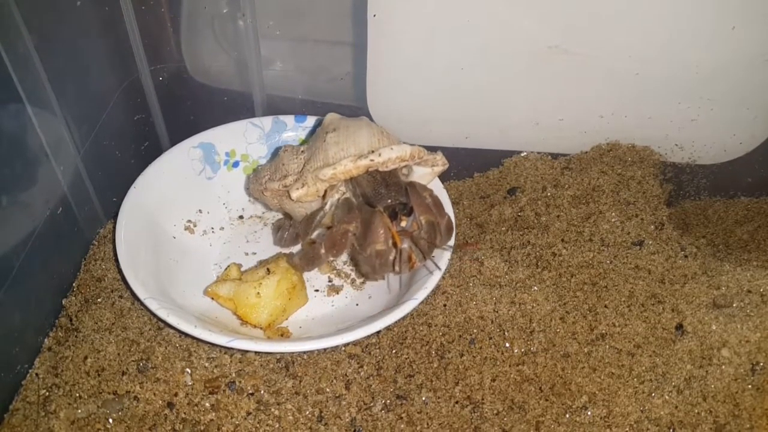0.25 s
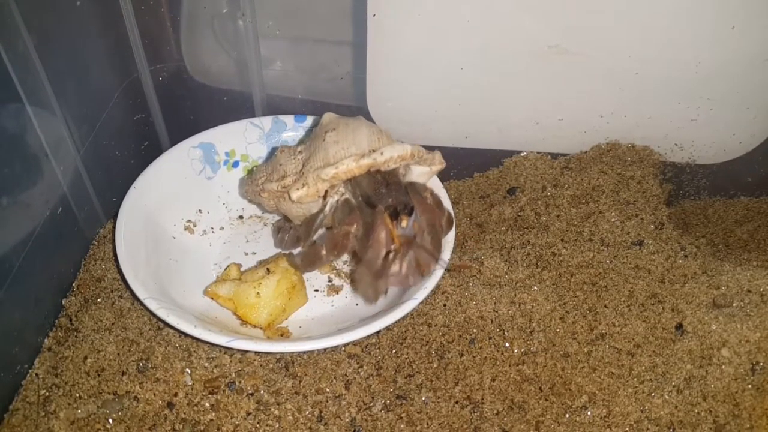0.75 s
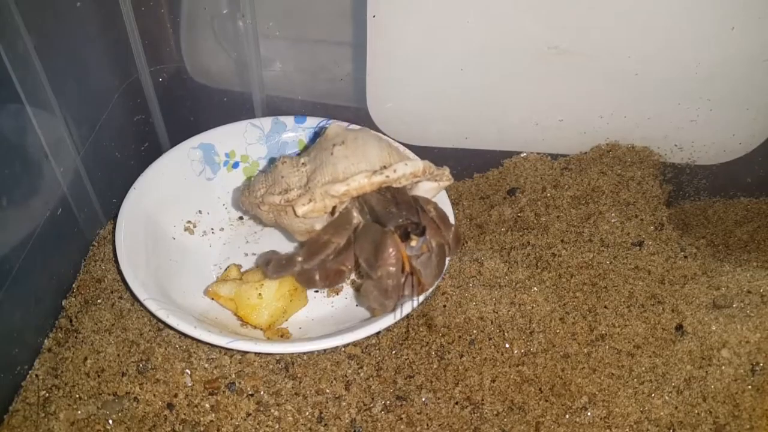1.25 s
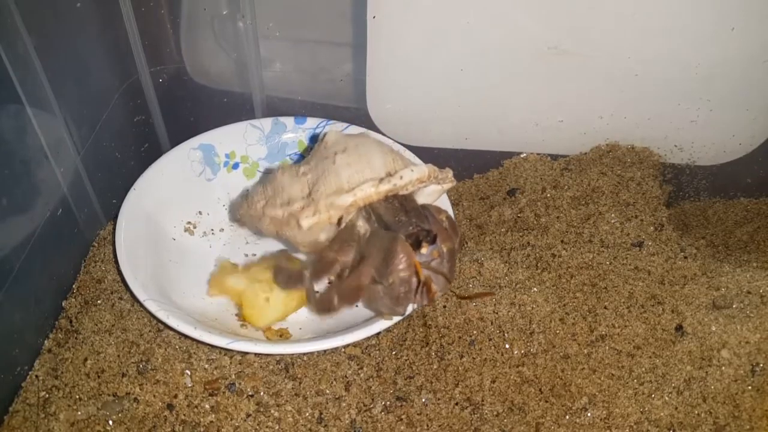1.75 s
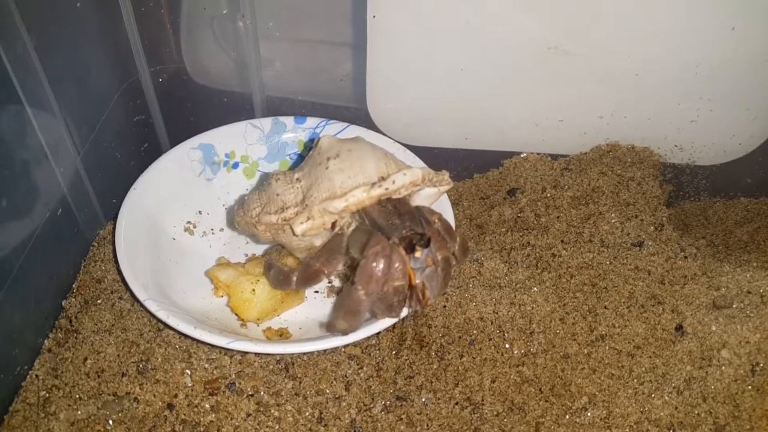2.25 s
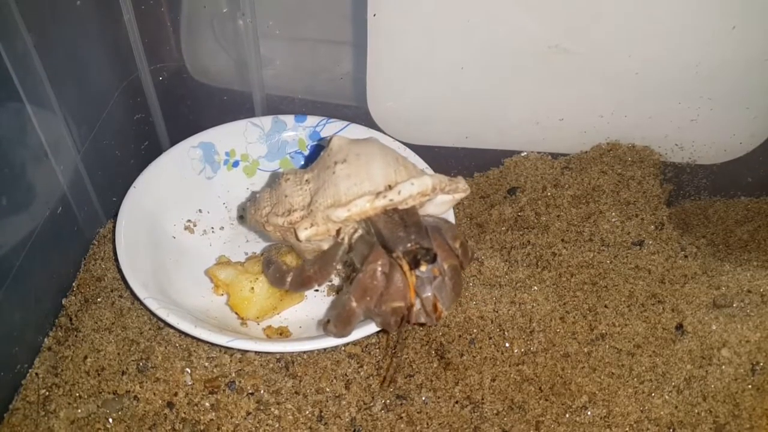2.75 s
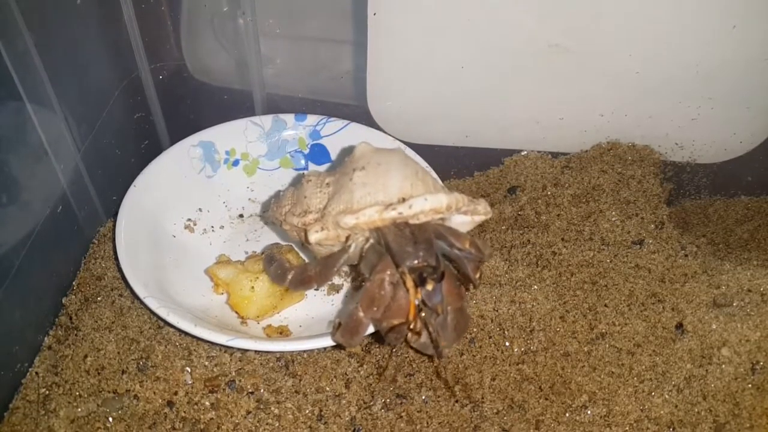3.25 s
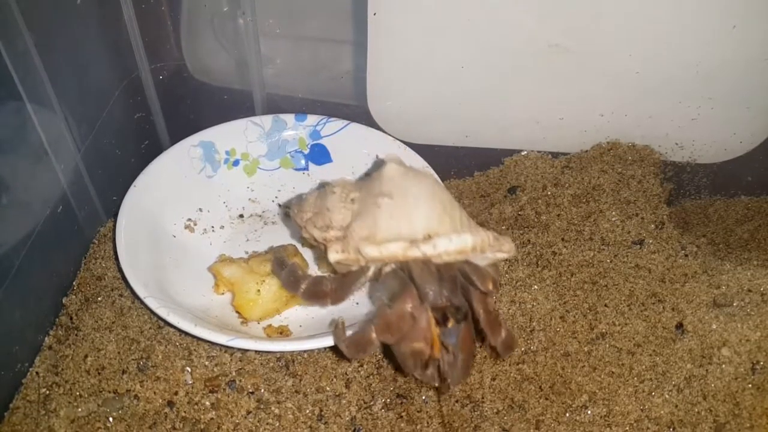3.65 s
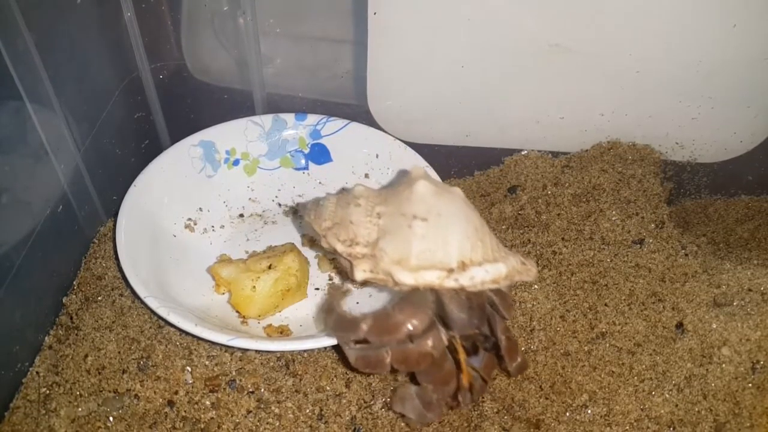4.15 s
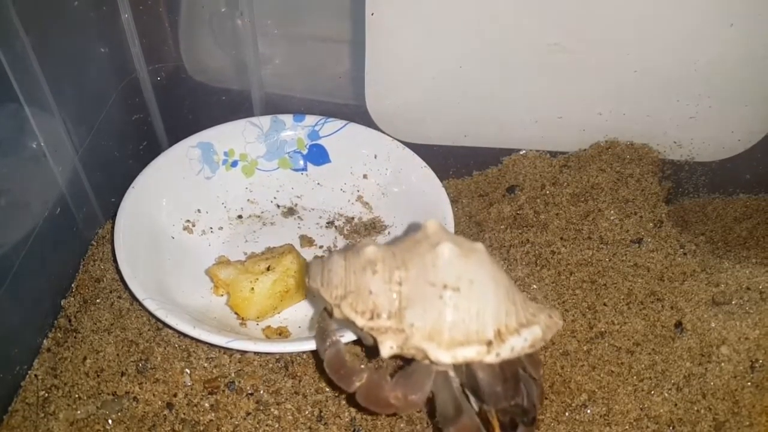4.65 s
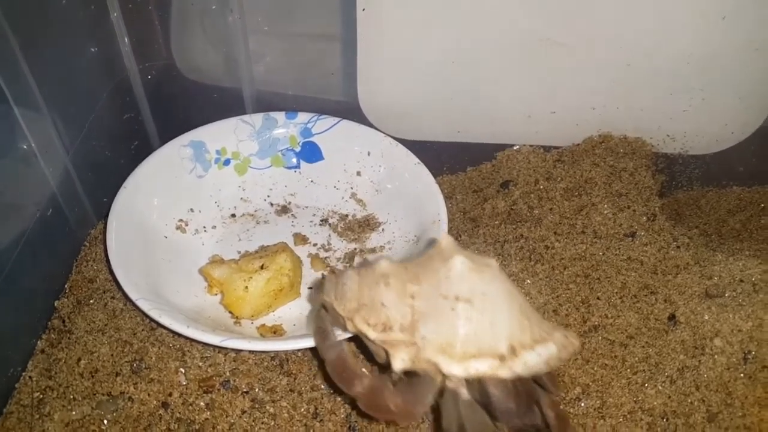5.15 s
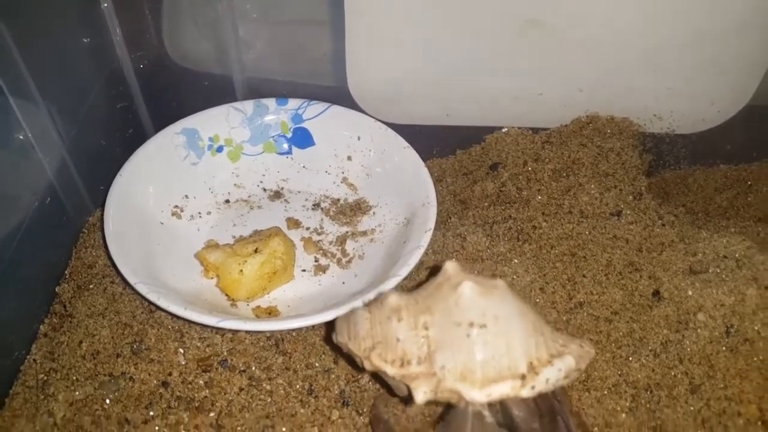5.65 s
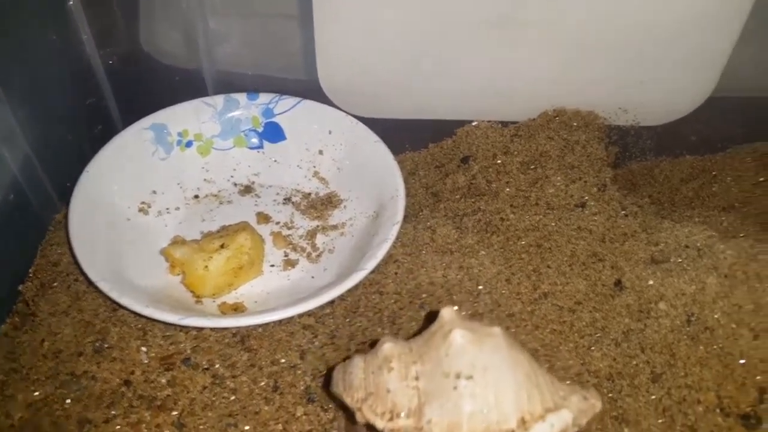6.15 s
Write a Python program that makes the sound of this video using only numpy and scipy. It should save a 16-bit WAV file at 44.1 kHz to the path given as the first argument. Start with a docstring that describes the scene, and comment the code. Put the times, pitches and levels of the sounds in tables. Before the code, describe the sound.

Small irregular ceramic taps and dry ticks thicken into thuds and short scrapes, then a sharp squeaky snap and sandy crunches, above electrical hum and hiss.

```python
"""A hermit crab climbs off a ceramic plate that lies on sand in a plastic tub.
Legs and shell tap the plate, whose decaying modes ring, and bump the lower modes of the tub.
Noise snaps make dry ticks; random slips make the shell drag and squeak; dense grains crunch as sand.
A diffuse tail gives the room, where steady sines hum and drone under shaped noise for air and hiss."""
import sys
import numpy as np
from scipy import signal
from scipy.fft import rfft, irfft, next_fast_len
from scipy.io import wavfile

SR = 44100
rng = np.random.default_rng(int(sys.argv[2]) if len(sys.argv) > 2 else 0)


def to_wav(sig):
    """Store sig (one row per channel, or 1-D mono) as 16-bit WAV at the path in sys.argv[1].

    Samples outside -1..1 are clipped; the rate is SR.
    """
    pcm = np.clip(np.atleast_2d(sig), -1, 1) * 32767
    pcm = np.round(pcm).astype(np.int16)
    wavfile.write(sys.argv[1], SR, pcm.T)  # frames by channels


N = 281799
TIME = np.arange(N) / SR

# Modes of the plate, damped by the sand. Each row: nominal frequency in Hz, relative level in dB,
# t60 in seconds before contact damping, left over right in dB.
PLATE_MODES = [(997, 5, 0.039, -3), (2187, -9.5, 0.13, -2), (2244, -6.5, 0.034, 20), (3150, -7, .03, 16),
               (3880, -0.5, 0.043, -20), (4330, 0.5, 0.021, -9), (4560, -1.5, 0.013, -4),
               (5770, 2.5, 0.05, -21), (7870, -15, 0.014, 10), (9030, -19, 0.12, 23), (10170, 1, 0.026, 6)]
# Modes of the tub with its sand. Each row: frequency in Hz, relative level in dB,
# t60 in seconds, left over right in dB.
TUB_MODES = [(112, -5, 0.072, 0), (174.5, -1, 0.12, -3.5), (282, 0, 0.021, -1), (341, 0, 0.045, -2.5),
             (455, -3, 0.057, -6.5), (654, 1, 0.022, -6.5), (816, -2.5, 0.023, -23),
             (1090, 0.5, 0.0072, -29)]


def from_db(db):
    """Gain for a level in dB."""
    return 10 ** (np.asarray(db) / 20)


def rms_one(x):
    """Scales to an rms of one."""
    return x / np.sqrt(np.mean(x ** 2) + 1e-30)


def at_hz(points, hz):
    """Reads a curve on a log-frequency axis."""
    f, value = np.transpose(points)
    return np.interp(np.log(hz), np.log(f), value)


def pan(db):
    """Left and right gains with a mean power of one."""
    return rms_one(from_db([[db / 2], [-db / 2]]))


def add(out, s, sound):
    """Mixes a short sound in at time s."""
    i = int(s * SR)
    out[:, i:i + sound.shape[-1]] += sound[:, :N - i]


def drift(rate):
    """Slow random wander through about unit-spread values, rate of them per second."""
    knots = rng.standard_normal(400)
    return np.interp(TIME * rate, np.arange(len(knots)), knots)


def noise(spectrum):
    """Two unrelated noises with the given dB per Hz."""
    size = next_fast_len(N)
    hz = np.maximum(np.arange(size // 2 + 1) * SR / size, 1)
    white = rfft(rng.standard_normal((2, size)))
    shaped = irfft(white * from_db(at_hz(spectrum, hz)), size)
    return shaped[:, :N] * np.sqrt(SR / 2)


def band(x, low_hz, high_hz):
    """Second-order Butterworth band-pass design."""
    sos = signal.butter(2, [low_hz, min(high_hz, SR / 2 - 1)], "band", fs=SR, output="sos")
    return signal.sosfilt(sos, x)


def ring(clicks, hz, t60):
    """A two-pole resonance: a unit click sets off a decaying sine that starts from height one."""
    r, w = np.exp(-np.log(1000) / (t60 * SR)), 2 * np.pi * hz / SR
    return signal.lfilter([0, np.sin(w)], [1, -2 * r * np.cos(w), r * r], clicks + 1e-18)


def grains(per_s, spread_db):
    """Random clicks of uneven size and either sign, rms one."""
    sizes = from_db(spread_db * np.minimum(rng.exponential(1, N), 3)) * rng.choice([-1, 1], N)
    return rms_one(sizes * (rng.random(N) < per_s / SR))


def swell(t, length):
    """A rounded rise and fall between t = 0 and length."""
    return np.sqrt(np.clip(1 - (2 * t / length - 1) ** 2, 0, 1))


def strike(modes, gains_db, lag_s):
    """Modes ring out after one blow; the sound reaches the right microphone later."""
    t = np.maximum(TIME[:SR // 4] - np.array([[0], [lag_s]]), 0)
    out = 0
    for k, ((hz, db, t60, side), gain_db) in enumerate(zip(modes, gains_db)):
        decay = np.exp(-np.log(1000) * t / t60)
        polarity = (-1) ** k
        out = out + polarity * pan(side) * from_db(db + gain_db) * np.sin(2 * np.pi * hz * t) * decay
    return out


def rubbed(slips, modes, grip):
    """Modes kept ringing by a stream of slips; each is scaled so that its decay time leaves its rms alone."""
    out = 0
    for k, (hz, db, t60, side) in enumerate(modes):
        even_rms = 2 * np.sqrt(np.log(1000) / (t60 * SR))
        gain = from_db(db + at_hz(grip, hz)) * even_rms
        out = out + (-1) ** k * pan(side) * gain * ring(slips, hz, t60)
    return out


def taps(crack_db=-2.5, crack_tilt=-0.5, thud_db=-6.5, thud_hz=226, hardness_db=10):
    """Each tap cracks at the contact, rings the plate and shakes the tub through the sand."""
    # Taps of legs and shell; the plate's lowest mode shifts with the crab's weight.
    # Each row: start in seconds, drive in dB before contact colour and gains,
    # hardness of the contact from 0 to 1, lowest mode in Hz.
    tap_rows = [(0.271, -59, 0.06, 1090), (0.342, -58, 0.39, 1010), (0.4622, -52.5, 0.01, 1055),
                (0.5406, -64, .2, 990), (0.5755, -59, 0.25, 990), (0.8819, -49.5, 0.81, 1060),
                (1.169, -57.5, 0.34, 1020), (1.851, -60.5, 0.38, 980), (2.626, -53, 0.04, 963),
                (3.037, -69, 0.72, 1000), (3.051, -71, 0.74, 1030), (3.067, -48.5, 0.07, 980),
                (3.158, -59, .2, 966), (3.175, -58, 0.08, 980), (3.222, -61, .1, 1090),
                (3.492, -54, 0.35, 950), (4.353, -59, 0.14, 1025), (4.443, -56, 0.23, 1060),
                (4.4922, -63.5, .85, 1030), (4.596, -59, 0.25, 1020), (4.617, -55.5, 0.32, 1030),
                (4.678, -68.5, 0.6, 1000), (4.726, -63.5, 0.52, 970), (4.833, -71, 0.7, 1020)]
    out = np.zeros((2, N))
    for s, db, hardness, lowest_hz in tap_rows:
        add(out, s, clink(db, hardness, lowest_hz))
        # The crack follows the force at 4 kHz; its tilt is in dB per octave.
        add(out, s, crack(db + contact_db(hardness, 4000) + crack_db, crack_tilt))
        # The hard shell weighs in more than a leg.
        add(out, s, thud(db + thud_db + hardness_db * hardness, thud_hz))
    return out


def clink(db, hardness, lowest_hz, ring_db=5.0, scatter_db=1.5, build_s=0.00034, lag_s=0.00017):
    """One contact rings the plate; the ring builds up within a millisecond or so."""
    contact_damping = 0.17   # share of t60 that the hardest contact takes away by pressing on the plate
    modes = np.array([(lowest_hz, *PLATE_MODES[0][1:]), *PLATE_MODES[1:]])
    modes[:, 2] *= np.clip(1 - contact_damping * hardness, .1, 1)
    scatter = scatter_db * rng.standard_normal(len(modes))
    force = db + contact_db(hardness, modes[:, 0]) + scatter
    build_up = 1 - np.exp(-TIME[:SR // 4] / build_s)
    return strike(modes, ring_db + force, lag_s) * build_up


def contact_db(hardness, hz):
    """Colour of a contact: the harder it is, the higher its force reaches; higher modes radiate better."""
    soft_top_hz, hardness_octaves = 870, 2.64   # softest contact's top; the hardest reaches this much higher
    fall_db_per_octave, radiation_db_per_octave = 18, 8.5
    top_hz = soft_top_hz * 2 ** (hardness_octaves * hardness)
    loss_db = fall_db_per_octave * np.log2(hz / top_hz)
    radiation_db = radiation_db_per_octave * np.log2(hz / PLATE_MODES[0][0])
    return radiation_db - 10 * np.log10(1 + from_db(loss_db) ** 2)


def crack(db, tilt, mid_side_db=-9.0, edge_side_db=11.0, t60=0.029):
    """A dry snap of decaying noise bands rattles briefly between the walls of the tub."""
    # Colour of a tick. Each row: frequency in Hz, gain in dB.
    tick_colour = [(1200, -13.5), (2500, -8.5), (4000, -1.5), (9000, -9)]
    out, t = 0, TIME[:SR // 10]
    edges = np.geomspace(1000, 16000, 8)
    for low, high in zip(edges, edges[1:]):
        hz = np.sqrt(low * high)
        gain = from_db(db + at_hz(tick_colour, hz) + tilt * np.log2(hz / 4000))
        side_db = edge_side_db if hz > 7000 else mid_side_db
        rattle = rms_one(band(rng.standard_normal((2, len(t))), low, high))
        out = out + pan(side_db) * gain * rattle
    return out * np.exp(-np.log(1000) * t / t60)


def thud(db, contact_hz, level_db=6.0, scatter_db=3.0, lag_s=0.000095):
    """One contact shakes the low modes of the tub; the softer it is, the lower the modes it favours."""
    scatter = scatter_db * rng.standard_normal(len(TUB_MODES))
    modes = strike(TUB_MODES, db + level_db + scatter, lag_s)
    return signal.lfilter(*signal.butter(1, [contact_hz / 2, contact_hz * 2], "band", fs=SR), modes)


def patter(per_s=3.6, level_db=-69, hardness=.15, end_s=3.7, spread_db=4.0, pitch_spread=0.038):
    """Light footfalls touch the plate at random while the crab stands on it."""
    out = np.zeros((2, N))
    times = np.cumsum(rng.exponential(1 / per_s, size=40))
    for s, (strength, shift) in zip(times, rng.standard_normal((len(times), 2))):
        if s < end_s:
            lowest_hz = PLATE_MODES[0][0] * (1 + pitch_spread * shift)
            add(out, s, clink(level_db + spread_db * strength, hardness, lowest_hz))
    return out


def ticks():
    """Dry clicks of claw tips, legs and shell, some together with a tap that rings the plate."""
    # Each row: start in seconds, level in dB at 4 kHz before the tick colour, tilt in dB per octave.
    tick_rows = [(1.169, -63, -11), (1.339, -55, -2), (1.587, -59.5, 1), (1.873, -51, -4),
                 (1.892, -51.5, 1), (1.923, -50.5, -5.5), (3.037, -63, -6), (3.052, -52.5, -4.5),
                 (3.451, -52.5, 5.5), (4.194, -56, -0.5), (4.285, -50.5, -4), (4.396, -55, -5),
                 (4.493, -53, 8), (4.507, -51.5, 0)]
    out = np.zeros((2, N))
    for s, db, tilt in tick_rows:
        add(out, s, crack(db, tilt))
    return out


def bumps():
    """The heavy shell knocks against the bedded plate and drops onto the sand, which shakes the tub."""
    # Each row: start in seconds, drive in dB before the thud's gain, pitch that the contact favours in Hz.
    bump_rows = [(1.893, -55.5, 200), (1.924, -51, 306), (4.4407, -46, 450), (4.488, -54.5, 282),
                 (4.516, -44.5, 200), (4.5372, -46.5, 423), (4.559, -50.5, 220), (4.657, -53, 594),
                 (4.766, -53, 295), (4.832, -53, 600), (5.0869, -43.5, 800), (5.109, -56, 500),
                 (5.6087, -48, 85), (5.6106, -45.5, 500)]
    out = np.zeros((2, N))
    for s, db, contact_hz in bump_rows:
        add(out, s, thud(db, contact_hz))
    return out


def drag(grit_db=-16.5, attack_s=0.023, release_s=.09):
    """The hauled shell sticks and slips on the sandy rim, shakes tub and plate and scratches faintly."""
    # The crab hauls its shell over the rim, then over sand. Each row: start in seconds, length in seconds,
    # drive into the tub in dB, drive into the plate in dB.
    pulls = [(4.165, .08, -60.5, -64.5), (4.355, 0.18, -58, -65), (4.574, 0.2, -58, -63.5),
             (5.097, 0.062, -59.5, -68), (5.264, 0.027, -59.5, -67)]
    # How well dragging on the rim drives the plate. Each row: frequency in Hz, gain in dB.
    rim_grip = [(1000, -10.5), (2240, -4.5), (3100, -13), (3900, -7.5), (4400, -18), (5800, -20),
                (10000, -32)]
    # How well dragging drives the tub. Each row: frequency in Hz, gain in dB.
    tub_grip = [(110, -3), (180, 5), (360, -1), (620, -9), (1150, -14)]
    tub_force, plate_force = np.zeros((2, N))
    for s, length, tub_db, plate_db in pulls:
        # Each pull swells before its start and fades after its end.
        attack = 1 + (TIME - s) / attack_s
        release = 1 - (TIME - s - length) / release_s
        effort = np.clip(np.minimum(attack, release), 0, 1)
        tub_force = np.maximum(tub_force, from_db(tub_db) * effort)
        plate_force = np.maximum(plate_force, from_db(plate_db) * effort)
    on_tub = grains(per_s=90, spread_db=3.5) * tub_force
    on_plate = grains(per_s=140, spread_db=3.0) * plate_force
    grit = band(grains(per_s=860, spread_db=5.5) * tub_force, 1500, 13000)
    shaken = rubbed(on_tub, TUB_MODES, tub_grip) + rubbed(on_plate, PLATE_MODES, rim_grip)
    return shaken + from_db(grit_db) * grit


def squeak():
    """Fine friction excites the shell's short, high resonances: a soft slide, then a sharp snap free."""
    # Resonances of the slipping shell, each passed twice. Each row: frequency in Hz, relative level in dB,
    # t60 of one pass in seconds, left over right in dB.
    shell_modes = [(3920, -5.5, 0.0081, 16), (4230, -3, 0.0023, 20), (4750, -6, 0.0012, 0),
                   (8500, -13, 0.0015, 22), (11300, -13, 0.00098, 20)]
    start_s, length_s, slide_db = 5.562, 0.051, -61.5
    snap_s, snap_db, rise_s, fall_s = 5.6102, -38.5, 0.0017, 0.0008
    friction = grains(per_s=9000, spread_db=9.5)
    slide = from_db(slide_db) * swell(TIME - start_s, length_s)
    snap = from_db(snap_db) * np.exp(-np.maximum((snap_s - TIME) / rise_s, (TIME - snap_s) / fall_s))
    shell = 0
    for hz, db, t60, side in shell_modes:
        resonance = rms_one(ring(ring(friction, hz, t60), hz, t60))
        shell = shell + pan(side) * from_db(db) * resonance
    return (slide + snap) * shell


def crunches(upper_db=-3.0):
    """Each press sets off a short swell of grinding sand grains, partly shared by the two microphones."""
    # Feet and shell press into the sand. Each row: start in seconds, level in dB, length in seconds,
    # grain pitch in Hz.
    crunch_rows = [(0.61, -61.5, 0.0042, 2290), (5.006, -63, 0.0067, 3140), (5.11, -68.5, 0.13, 2450),
                   (5.28, -68, 0.12, 2270), (5.695, -67, 0.037, 2800), (5.814, -61, 0.025, 2450),
                   (5.852, -62.5, 0.019, 2660), (5.926, -60.5, 0.029, 2440), (5.985, -60, 0.019, 2420)]
    out, t = np.zeros((2, N)), TIME[:SR // 4]
    shared, left, right = [grains(per_s=1200, spread_db=4.5) for _ in range(3)]
    stream = shared + np.array([left, right])
    for s, db, length, hz in crunch_rows:
        sand = stream[:, int(s * SR):][:, :len(t)]
        upper = band(sand, hz * 1.2, hz * 1.94)
        colour = band(sand, hz / 1.35, hz * 1.34) + from_db(upper_db) * upper
        add(out, s, from_db(db) * swell(t, length) * rms_one(colour))
    return out


def room(x, t60=0.73, wall_hz=4300, wet_db=-9.0):
    """A faint diffuse tail of decaying noise, duller than the direct sound."""
    t = TIME[:SR]
    tail = rng.standard_normal((2, SR)) * np.exp(-np.log(1000) * t / t60) * (t > .008)
    tail = signal.lfilter(*signal.butter(2, wall_hz, fs=SR), tail)
    tail /= np.sqrt(np.sum(tail ** 2) / 2 * SR / 2 / wall_hz)
    return from_db(wet_db) * signal.fftconvolve(x.mean(axis=0)[None], tail, axes=1)[:, :N]


def hum(waver_db=0.93, wander_s=.0001):
    """Mains and a motor: steady sines that waver a little in level and in phase."""
    # Each row: frequency in Hz, rms level in dB before the waver, left over right in dB.
    hum_lines = [(47.9, -52.5, 1), (99.97, -60, 3.5), (109.55, -70, -7), (194, -67, 2), (249.6, -74.5, -8),
                 (300.94, -56, -2), (401.1, -62.5, -1.5), (519, -81.5, 9), (598.6, -77.5, 10),
                 (703, -72, 6), (798, -81, -15)]
    t = TIME + wander_s * drift(1.64)
    out = 0
    for hz, db, side in hum_lines:
        level = np.sqrt(2) * from_db(db + waver_db * drift(5.4))
        out = out + pan(side) * level * np.sin(2 * np.pi * (hz * t + rng.random()))
    return out


def background():
    """Room air as shaped noise, most alike on both sides in the bass, and each microphone's own hiss."""
    # Room air. Each row: frequency in Hz, level in dB per Hz.
    air = [(32, -100), (60, -85.5), (120, -90), (180, -86), (225, -85.5), (430, -90), (520, -97),
           (850, -96.5), (1400, -103), (2800, -107), (6000, -110), (7500, -122), (16000, -135)]
    # Left-right likeness of the air. Each row: frequency in Hz, shared part of the power from 0 to 1.
    likeness = [(60, 1), (300, 0.67), (700, 0.23), (1500, 0.07), (5000, 0.17)]
    # Hiss of the left, then of the right microphone. Each row: frequency in Hz, level in dB per Hz.
    hiss = [
        [(1000, -118), (5000, -113), (10000, -113), (15500, -109)],
        [(1000, -122), (8500, -120), (11500, -115), (15500, -110)],
    ]
    # Resonances in the left microphone's hiss. Each row: centre in Hz, approximate width in Hz,
    # peak level in dB per Hz.
    hiss_peaks = [(4583, 760, -95.5), (6200, 680, -101)]
    hz = np.geomspace(20, 16000, 80)
    alike, air_db = np.clip(at_hz(likeness, hz), 0, .99), at_hz(air, hz)
    shared_air = noise(np.c_[hz, air_db + 10 * np.log10(alike)])[0]
    separate_air = noise(np.c_[hz, air_db + 10 * np.log10(1 - alike)])
    out = shared_air + separate_air
    out += [noise(spectrum)[0] for spectrum in hiss]
    for centre, width, db in hiss_peaks:
        b, a = signal.iirpeak(centre, centre / (width * np.sqrt(2)), fs=SR)
        peak = signal.lfilter(b, a, signal.lfilter(b, a, rng.standard_normal(N)))
        out[0] += from_db(db) * np.sqrt(SR / 2) * peak
    return out


def scene():
    """The crab in its tub, over the hum and hiss of the room."""
    crab = taps() + patter() + ticks() + bumps() + drag() + squeak() + crunches()
    return crab + room(crab) + hum() + background()


def record(dry):
    """An elliptic low-pass cuts the top steeply."""
    cutoff_hz = 15800
    return signal.sosfilt(signal.ellip(10, .1, 70, cutoff_hz, fs=SR, output="sos"), dry)


dry = scene()
out = record(dry)
to_wav(out)
```